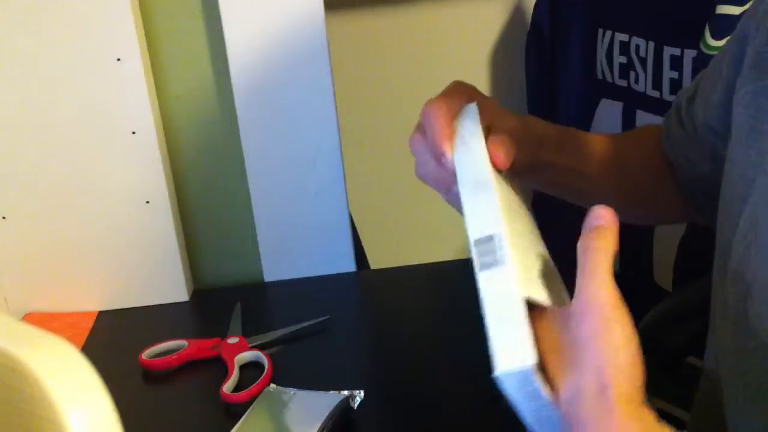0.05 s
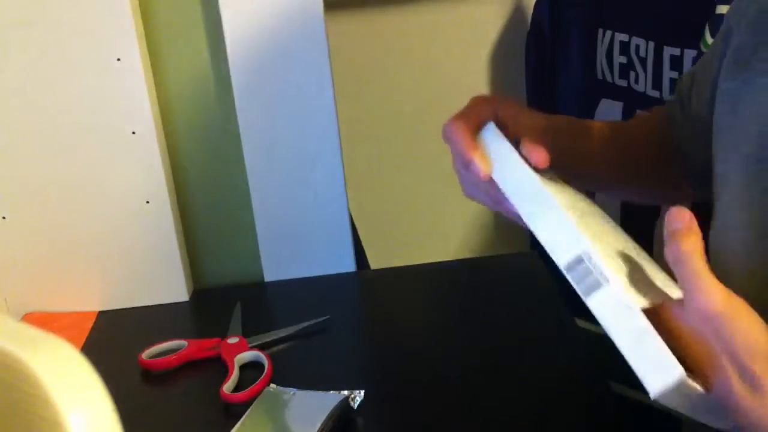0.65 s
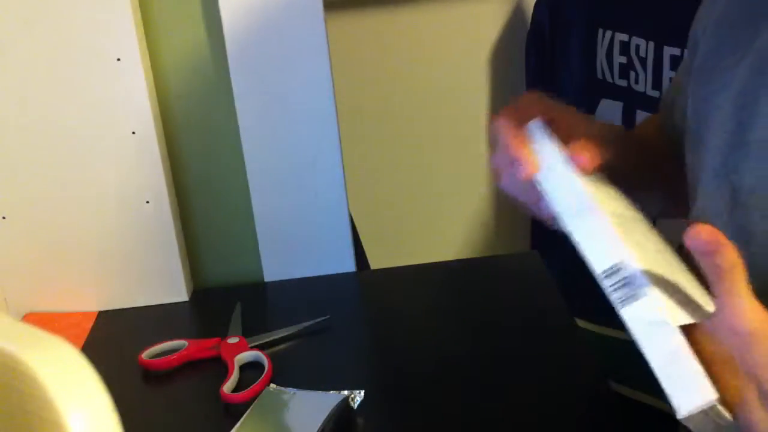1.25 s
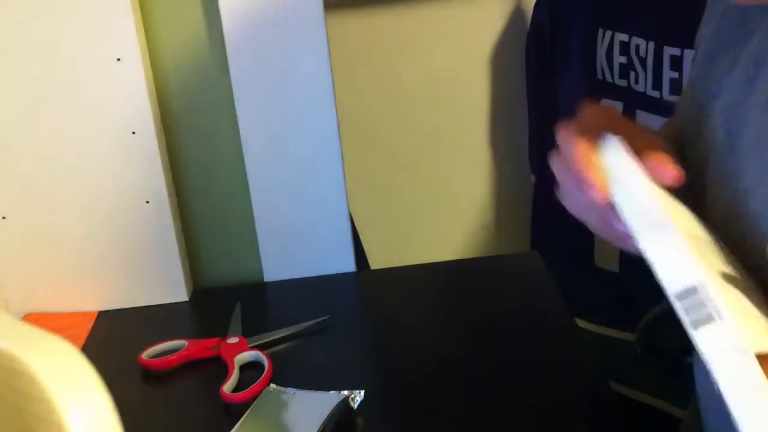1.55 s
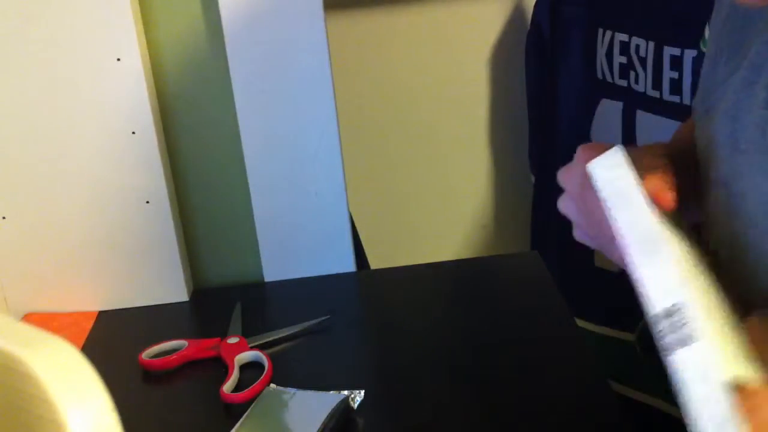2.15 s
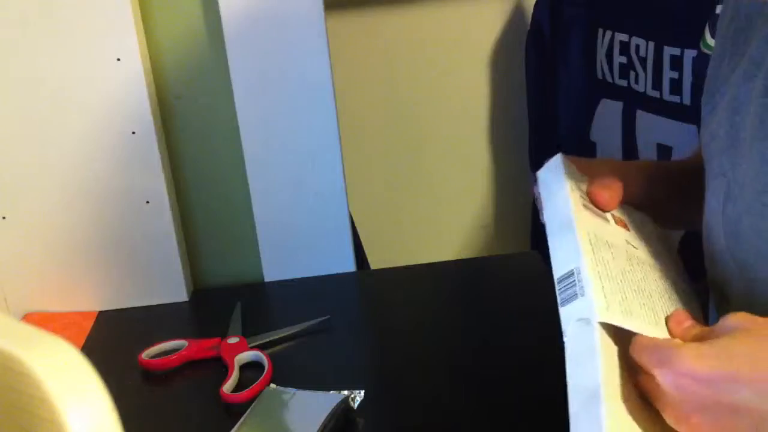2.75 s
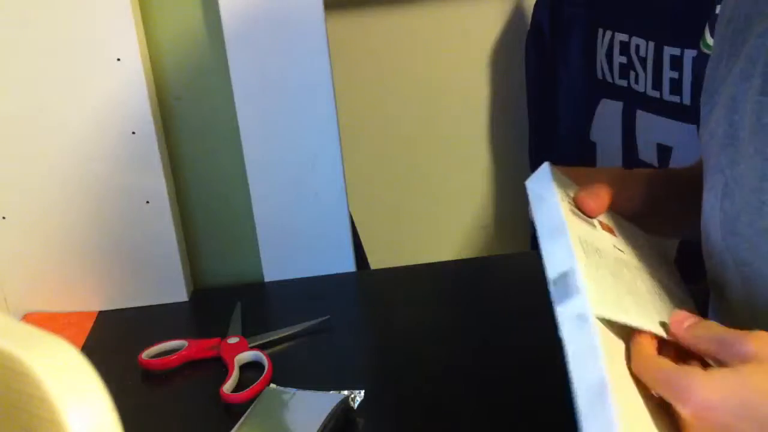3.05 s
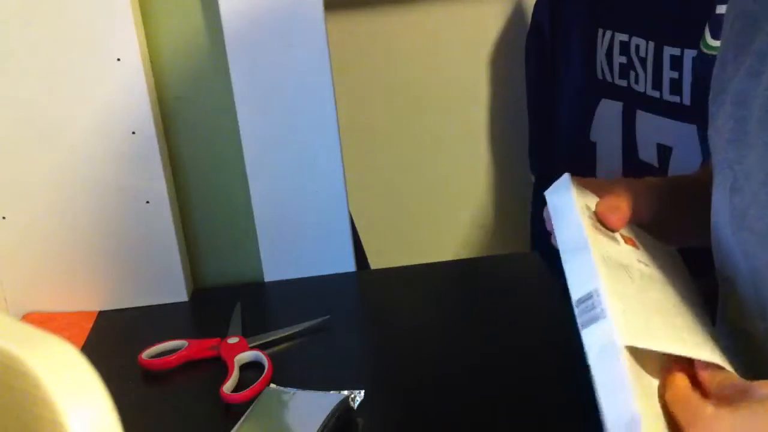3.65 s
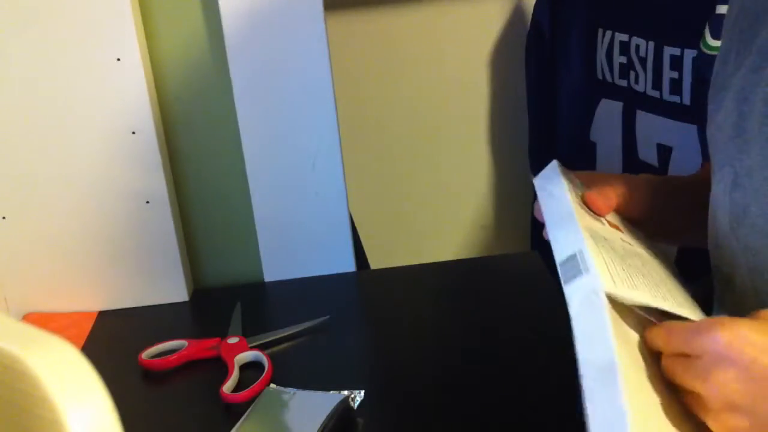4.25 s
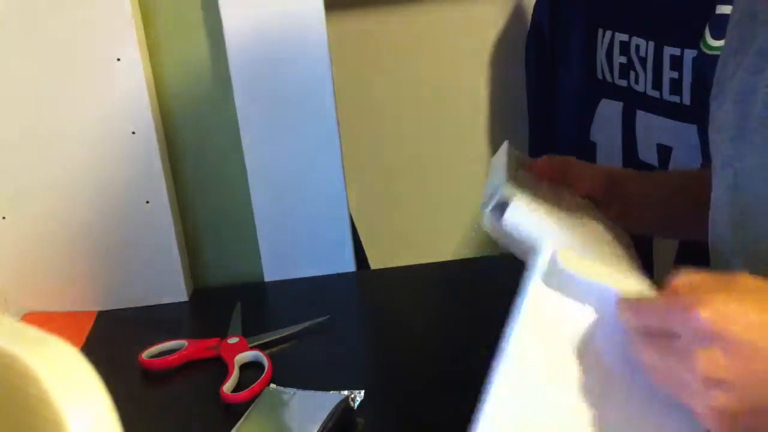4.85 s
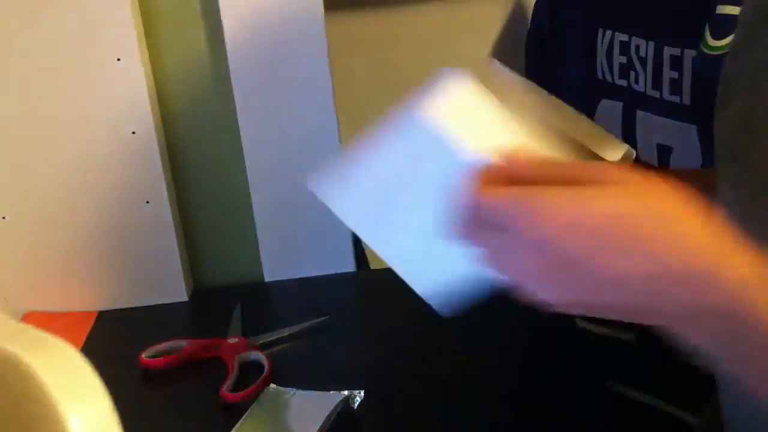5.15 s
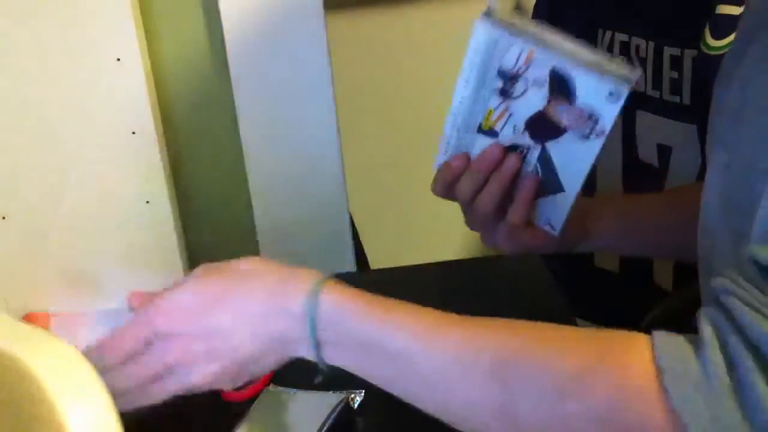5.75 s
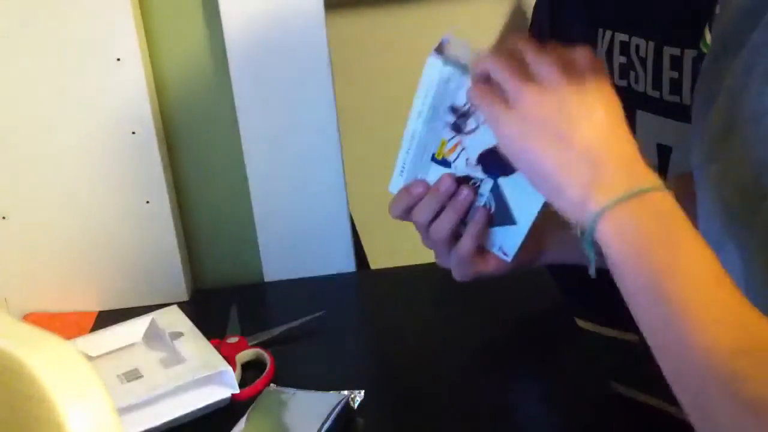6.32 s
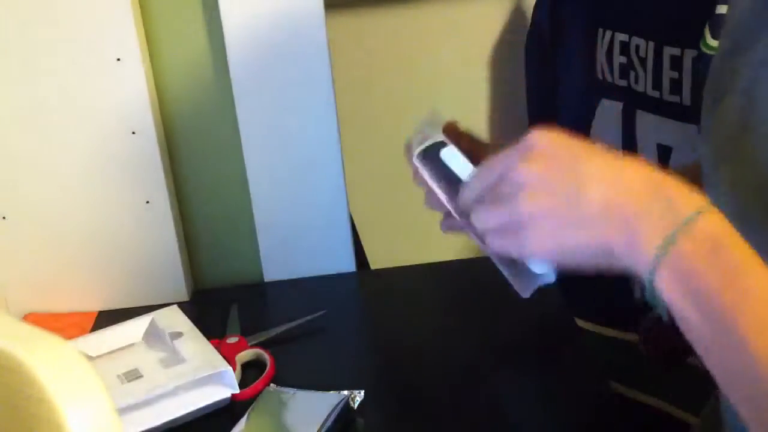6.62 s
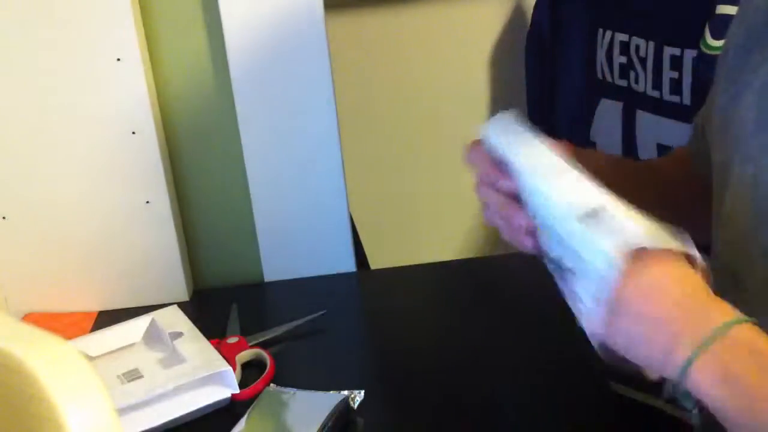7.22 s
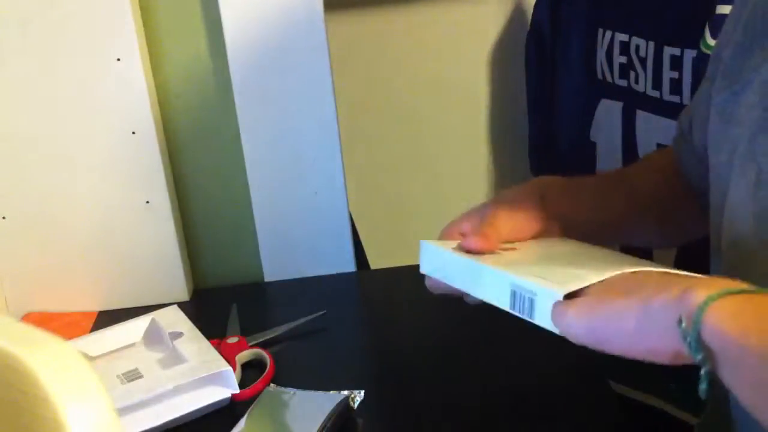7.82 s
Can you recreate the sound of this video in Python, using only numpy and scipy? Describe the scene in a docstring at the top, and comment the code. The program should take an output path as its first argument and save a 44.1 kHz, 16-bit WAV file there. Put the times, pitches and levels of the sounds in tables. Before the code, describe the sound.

Hands work at a small cardboard box in a quiet room. The card rubs and scrapes in short strokes, with little snaps and hollow taps, then creaks and rips free in one quick, loud tear. A light inner tray clatters onto a desk. A hand slides into the empty sleeve with a dry hiss and pops its wall out. It sounds close, over a faint hum.

```python
"""Opening a small cardboard box

Hands work a box open in a room: creases snap, card rubs and creaks as it sticks and slips, and a flap
rips free. The inner tray is dropped on a desk and clatters. A hand slides into the empty sleeve and
pops its wall out. Each knock rings the hollow card. A faint mains hum and hiss lie underneath."""
import sys
import numpy as np
from scipy import signal
from scipy.fft import rfft, irfft, next_fast_len
from scipy.io import wavfile
from scipy.ndimage import uniform_filter1d, map_coordinates

SR = 44100
rng = np.random.default_rng(int(sys.argv[2]) if len(sys.argv) > 2 else 0)


def waveform_to_disk(signal):
    """Save audio, clipped to [-1, 1], as 16-bit WAV at the path in sys.argv[1]."""
    frames = np.transpose(np.atleast_2d(signal))
    scaled = np.clip(frames, -1, 1) * 32767
    samples = np.round(scaled).astype(np.int16)
    wavfile.write(sys.argv[1], SR, samples)


N = 351803
HIT_SIZE = 8192  # samples in one hit or one filter

# The pitches at which the hollow box rings: pitch_hz, level_db
BOX_RINGS = [(490, 2), (555, 3.5), (630, 4), (760, 1), (940, -1.5), (1120, 0.5), (1280, -3.5), (1540, -0.5),
             (1780, -7), (2050, -46)]
# Tone of the low murmur of the held box: pitch_hz, level_db
MURMUR_TONE = [(60, -56), (110, -14), (160, 3), (300, 0), (420, 1.5), (800, -44.5)]
# Tone of card cracking: pitch_hz, level_db
CRACK_TONE = [(700, 2), (1300, -0.5), (1900, 2.5), (2500, 4), (3100, 1.5), (4200, -1.5), (5200, -6.5),
              (8000, -27.5)]
# Tone of the high fizz on top of a crack: pitch_hz, level_db
FIZZ_TONE = [(2500, -32), (4300, -11.5), (5200, 2), (6300, 4), (7400, -3.5), (10500, -5), (13000, -11.5),
             (16000, -28.5)]
# Fingers and card dragging on card, one row a stroke: start_s, end_s, body_db, scrape_boost_db
STROKES = [(0.0, 0.11, -51.5, 0.5), (0.195, 0.45, -57, -4), (0.573, 0.733, -53, -1),
           (0.773, 0.906, -58.5, -7), (0.97, 1.229, -56, -2.5), (1.419, 1.54, -53.5, -1.5),
           (1.535, 1.67, -49.5, -2.5), (1.683, 1.837, -57, 3), (1.878, 2.065, -51, -4.5),
           (2.072, 2.31, -52, -1), (2.364, 2.495, -50, 0), (2.571, 2.632, -57.5, -1.5),
           (2.759, 2.9, -51.5, -7), (3.0, 3.276, -56, 0), (3.367, 3.453, -62, -2), (3.487, 3.671, -55.5, 2),
           (3.701, 3.943, -55, 4), (3.976, 4.086, -65.5, -1.5), (4.099, 4.269, -54.5, -0.5),
           (4.339, 4.67, -58, 2), (4.85, 5.05, -63, 3), (5.783, 5.87, -83, 18), (6.555, 6.81, -62.5, 0)]


def amp(db):
    """Turn decibels into a gain to multiply by."""
    return 10 ** (np.asarray(db) / 20)


def unit(x):
    """Scale a sound to an average (rms) level of 1."""
    return x / np.sqrt(np.mean(x ** 2) + 1e-20)


def unit_hit(x, first_s=0.012):
    """Scale a hit so that its first moments have an average (rms) level of 1."""
    return x / np.sqrt(np.mean(x[:int(first_s * SR)] ** 2) + 1e-20)


def along(points, hz):
    """Read between (pitch_hz, value) points, giving each octave equal room."""
    pitches, values = np.transpose(points)
    return np.interp(np.log(hz + 1), np.log(pitches), values)


def wobble(per_s):
    """A smooth curve through per_s random values a second."""
    return map_coordinates(rng.standard_normal(int(N * per_s / SR) + 4), [np.arange(N) * per_s / SR])


def through(x, response):
    """Filter a sound. The response is what the filter gives back for a single click."""
    return signal.fftconvolve(x, response)[:len(x)]


def sharp_filter(gain):
    """A filter with the given gain at each pitch and no sound ahead of its attack."""
    cepstrum = irfft(np.log(gain + 1e-6))
    # Folding the second half onto the first moves the energy to the start.
    cepstrum[1:HIT_SIZE // 2] *= 2
    cepstrum[HIT_SIZE // 2 + 1:] = 0
    return irfft(np.exp(rfft(cepstrum)))


def tone(points):
    """A filter that follows (pitch_hz, level_db) points."""
    return sharp_filter(amp(along(points, np.fft.rfftfreq(HIT_SIZE, 1 / SR))))


def resonator(rings, scatter_db=0, detune=0, sharpness=11):
    """A filter that rings briefly like card; a new grip can shift each ring's level and pitch."""
    hz = np.fft.rfftfreq(HIT_SIZE, 1 / SR)
    spectrum = 0
    for k, (pitch_hz, level_db) in enumerate(rings):
        centre = pitch_hz * np.exp(detune * rng.normal())
        gain = (-1) ** k * amp(level_db + scatter_db * rng.normal())
        loss = 1j * hz * centre / sharpness
        spectrum = spectrum + gain * loss / (centre ** 2 - hz ** 2 + loss)
    return irfft(spectrum)


def fibres(size, per_s, spread_db):
    """Fibres slip and break at random moments: tiny clicks, a few larger than the rest."""
    happens = rng.random(size) < per_s / SR
    signs = rng.choice([-1, 1], size)
    strengths = amp(spread_db * np.minimum(rng.exponential(size=size), 4))
    return unit(happens * signs * strengths)


def crackle(fade_s, first_break):
    """One sharp break and a burst of small ones that dies by 60 dB in fade_s."""
    t = np.arange(HIT_SIZE) / SR
    burst = fibres(HIT_SIZE, per_s=5000, spread_db=3.5) * amp(-60 * t / max(fade_s, 0.003))
    burst /= np.linalg.norm(burst) + 1e-9
    burst[int(0.0006 * SR)] += first_break
    power = np.abs(uniform_filter1d(np.abs(rfft(burst)) ** 2, size=80))
    return through(burst, sharp_filter(1 / np.sqrt(power + 1e-6)))  # all pitches about equally strong


def background():
    """Steady hiss and the hum of a mains appliance."""
    # The tones of the hum: pitch_hz, level_db
    hum_tones = [(119.3, -68.5), (238, -78.5)]
    # Tone of the room's hiss: pitch_hz, level_db
    air_tone = [(25, 1), (70, -11), (120, -8), (200, -15), (330, -20), (650, -14), (1200, -17),
                (2500, -22.5), (6000, -26), (14000, -30.5), (16000, -32)]
    t = np.arange(N) / SR
    hum = sum(amp(db) * np.sqrt(2) * np.sin(2 * np.pi * hz * t + 0.14 * wobble(1.9))
              for hz, db in hum_tones)
    return hum + amp(-63) * unit(through(rng.standard_normal(N), tone(air_tone)))


def room_echo(x, early_db, tail_db):
    """Desk and near walls answer first, then the room rings; each short block gets a new random echo."""
    # How long the room takes to fade by 60 dB: pitch_hz, fade_s
    fade_times = [(150, 0.3), (500, 0.17), (1500, 0.26), (5000, 0.25), (14000, 0.22)]
    out, block = np.zeros(N + 2 * SR), SR // 3
    for start in range(0, N, block):
        hz, t, noise = signal.stft(rng.standard_normal(SR // 2), SR, nperseg=256)
        fade = amp(-60 * t / along(fade_times, hz)[:, None])
        build_up = 1 - np.exp(-t / 0.03)
        tail = signal.istft(noise * fade * build_up, SR, nperseg=256)[1]
        response = amp(tail_db) * tail / np.linalg.norm(tail)
        wall_delays = (rng.uniform(0.003, 0.014, size=6) * SR).astype(int)
        response[wall_delays] += amp(early_db) * rng.uniform(0.21, 1, size=6)
        echo = signal.fftconvolve(x[start:start + block], response)
        out[start:start + len(echo)] += echo
    return out[:N]


def stroke(start, end, rise_s=0.014, sag_db=4.5, fade_s=0.3):
    """Loudness of one drag: it grips quickly, eases as it goes and dies away when the fingers stop."""
    t = np.arange(N) / SR
    rise = np.clip((t - start) / rise_s + 0.5, 0, 1)
    progress = np.clip((t - start) / (end - start), 0, 1)
    release = np.clip((t - end) / fade_s, 0, 2)
    return rise * amp(-sag_db * progress - 60 * release)


def rubbing():
    """Card drags on card: coarse slips ring the box, finer ones scrape, and edges tick free."""
    # Tone of card scraping on card: pitch_hz, level_db
    scrape_tone = [(700, -4.5), (1400, -20.5), (2000, 5), (3100, 1), (4300, -0.5), (6200, 0), (7600, -5),
                   (11000, -5.5), (16000, -17.5)]
    press, drag = np.zeros(N), np.zeros(N)
    for start, end, body_db, scrape_boost_db in STROKES:
        gain = amp(body_db) * stroke(start, end)
        press += gain
        drag += amp(scrape_boost_db) * gain
    grip_db = 3.6 * wobble(40)  # the fingers catch and let go
    slips = fibres(N, per_s=1200, spread_db=5)
    ticks = fibres(N, per_s=56, spread_db=2.5)
    grain = fibres(N, per_s=7400, spread_db=2)
    murmur = amp(-8) * unit(through(rng.standard_normal(N), tone(MURMUR_TONE)))
    body = amp(-1) * unit(through(slips + 0.36 * ticks, resonator(BOX_RINGS, scatter_db=2)))
    scrape = amp(-2.5) * unit(through(0.74 * slips + 0.23 * ticks + grain, tone(scrape_tone)))
    return amp(grip_db) * (press * (murmur + body) + drag * scrape)


def sliding():
    """The hand pushes into the sleeve, speeding up and slowing down: a hiss over the box's murmur."""
    # The pushes of the hand: start_s, end_s, level_db
    pushes = [(6.787, 6.996, -52.5), (6.981, 7.176, -47), (7.18, 7.563, -47.5), (7.677, 7.873, -55.5),
              (7.868, 8.044, -62)]
    # Tone of skin sliding on card: pitch_hz, level_db
    skin_tone = [(700, -10), (1300, -9), (2500, 1), (4300, -4), (6000, 1.5), (8000, -3), (11500, -0.5),
                 (14000, -6.5), (16000, -14.5)]
    t, push = np.arange(N) / SR, np.zeros(N)
    for start, end, level_db in pushes:
        speed = np.abs(np.sin(np.pi * np.clip((t - start) / (end - start), 0, 1)))
        push += amp(level_db) * speed ** 0.78  # faster is louder
    slips = fibres(N, per_s=4400, spread_db=0.5)
    flicker = amp(1.7 * wobble(25) + 0.2)
    hiss = flicker * unit(through(fibres(N, per_s=11000, spread_db=4), tone(skin_tone)))
    body = unit(through(slips, resonator(BOX_RINGS, scatter_db=-4.5)))
    murmur = amp(-7.5) * unit(through(slips, tone(MURMUR_TONE)))
    return push * (hiss + amp(-9 + 2.3 * wobble(30)) * (body + murmur))


def squeaking(fade_s=0.037):
    """A tight spot chirps: a brief run of slips rings the card at one pitch."""
    # Card squeaking on card: start_s, pitch_hz, level_db
    squeaks = [(0.603, 2020, -51.5), (0.66, 1940, -47.5), (0.695, 2500, -54), (1.91, 2150, -46)]
    out, t = np.zeros(N + HIT_SIZE), np.arange(HIT_SIZE) / SR
    for start, pitch_hz, level_db in squeaks:
        slips = fibres(HIT_SIZE, per_s=1800, spread_db=0.5) * amp(-60 * t / fade_s)
        chirp = unit_hit(through(slips, resonator([(pitch_hz, 0)])))
        out[int(start * SR):][:HIT_SIZE] += amp(level_db) * chirp
    return out[:N]


def creaking():
    """A tight edge sticks and slips, in uneven runs of dry ticks or in single jerks."""
    # Edges creaking past each other: start_s, end_s, slips_per_s, level_db
    creaks = [(0.606, 0.686, 89, -56.5), (4.131, 4.24, 72, -58.5), (4.426, 4.53, 75, -57)]
    # Edges slipping just once: start_s, level_db
    jerks = [(2.827, -29), (2.981, -33.5), (4.1679, -29), (4.2203, -27), (4.341, -29), (4.367, -31.5),
             (4.3869, -32), (4.4189, -30.5), (4.5386, -30), (7.129, -26.5)]
    slips = np.zeros(N)
    for start, end, per_s, level_db in creaks:
        pace, strength = rng.standard_normal((40, 2)).T
        times = start + np.cumsum(np.exp(0.3 * pace) / per_s)
        sizes = amp(level_db + 3 * strength) * np.sqrt(SR / per_s)
        slips[(times[times < end] * SR).astype(int)] += sizes[times < end]
    for start, level_db in jerks:
        slips[int(start * SR)] += amp(level_db + 7)
    tick = through(crackle(fade_s=0.018, first_break=0.15), tone(CRACK_TONE) + amp(-1) * tone(FIZZ_TONE))
    return through(slips, tick / np.linalg.norm(tick))


def ripping():
    """A running tear or scrape: fibres break thick and fast for as long as the pull lasts."""
    # Runs of breaking or scraping fibres: start_s, end_s, level_db
    rips = [(0.577, 0.657, -66), (2.004, 2.015, -36), (2.02, 2.088, -46), (4.664, 4.693, -31),
            (5.902, 5.973, -42)]
    t = np.arange(N) / SR
    pull = sum(amp(db) * np.interp(t, [start - 0.004, start + 0.004, end, end + 0.006], [0, 1, 1, 0])
               for start, end, db in rips)
    breaks = fibres(N, per_s=2900, spread_db=1)
    body = amp(-3) * unit(through(breaks, resonator(BOX_RINGS)))
    murmur = amp(-13.5) * unit(through(breaks, tone(MURMUR_TONE)))
    crack = unit(through(breaks, tone(CRACK_TONE)))
    fizz = amp(-0.5) * unit(through(breaks, tone(FIZZ_TONE)))
    return pull * unit(body + murmur + crack + fizz)


def crease_filter():
    """Each creased spot adds one short, papery ring to its own crack."""
    response = amp(2.5) * resonator([(3050, 0)], scatter_db=1, detune=0.3)
    response[0] += 1  # lets the crack itself through
    return response


def hits(rows, rings, bends, first_break, thump_gain, body_gain, crack_gain, fizz_gain):
    """Each hit cracks and fizzes, rings the hollow body and bends the wide panels with a thump."""
    out, t = np.zeros(N + 2 * HIT_SIZE), np.arange(HIT_SIZE) / SR
    crack_filter, fizz_filter = tone(CRACK_TONE), tone(FIZZ_TONE)
    for start, thump_db, body_db, crack_db, fizz_boost_db, fade_s, pitch_hz in rows:
        burst = crackle(fade_s, first_break)
        tautness = np.exp(0.067 * rng.normal())  # set by the grip
        thump = np.zeros(HIT_SIZE)
        for k, (hz, db, ring_s) in enumerate(bends):
            fade = amp(db + rng.normal() - 60 * t / ring_s)
            thump += (-1) ** k * fade * np.sin(2 * np.pi * hz * tautness * t)
        # The struck spot favours rings near one pitch; the others lose 8.5 dB an octave.
        favoured = [(hz, db - 8.5 * abs(np.log2(hz / pitch_hz))) for hz, db in rings]
        body = through(burst, resonator(favoured, scatter_db=3.5, detune=0.03))
        crack = through(through(burst, crack_filter), crease_filter())
        hit = thump_gain * amp(thump_db) * unit_hit(thump)
        hit += body_gain * amp(body_db) * unit_hit(body)
        hit += crack_gain * amp(crack_db) * unit_hit(crack)
        hit += fizz_gain * amp(crack_db + fizz_boost_db) * unit_hit(through(burst, fizz_filter))
        out[int(start * SR):][:HIT_SIZE] += hit
    return out[:N]


def tray_clatter(fade_s=0.065, fizz_boost_db=-1.5):
    """The tray hits the desk: hard landings on an edge ring high, soft ones on a flat side ring low."""
    # The tray landing and rocking: start_s, body_db, hardness_db
    landings = [(5.8546, -30.5, -8), (5.8871, -33.5, -5), (5.9136, -31.5, 4.5), (5.9382, -36.5, 0),
                (5.9624, -32, -7), (6.0127, -39, -0.5), (6.0282, -38, -6), (6.0591, -37.5, 2),
                (6.0814, -36.5, -7), (6.122, -48.5, -18), (6.1592, -49, -22), (6.2565, -51.5, -13)]
    # The pitches at which the hollow tray rings: pitch_hz, level_db
    tray_rings = [(400, 4.5), (490, -0.5), (570, -0.5), (700, 2.5), (930, -4.5), (1260, -0.5), (1600, -2.5)]
    # The tray's wide panels bending to and fro: pitch_hz, level_db, ring_s
    tray_bends = [(143, -2, 0.1), (212.4, -2.5, 0.31), (287, 3, 0.12), (378, -6.5, 0.19)]
    rows = []
    for start, body_db, hardness_db in landings:
        pitch_hz = 860 * 2 ** (hardness_db / 16.5)
        rows.append((start, body_db - 5.5, body_db, body_db + hardness_db, fizz_boost_db, fade_s, pitch_hz))
    return hits(rows, tray_rings, tray_bends, first_break=0.18,
                thump_gain=amp(2.5), body_gain=amp(1), crack_gain=amp(-1.2), fizz_gain=amp(-4))


def crinkles(per_s=5, tries=4):
    """Rows for snaps(): small creases give way at random during a stroke, louder in a strong one."""
    rows = []
    for start, end, body_db, scrape_boost_db in STROKES:
        for when, chance, softness in rng.random((tries, 3)):
            level_db = body_db + 0.5 - 3 * softness
            if chance < per_s * (end - start) / tries:
                rows.append((start + when * (end - start), level_db + scrape_boost_db - 2, level_db, 0))
    return rows


def snaps(pitch_hz=816):
    """Rows for hits(): a crease gives way with a short, bright crack that hardly bends the panel."""
    # Creases snapping: start_s, crack_db, body_db, fizz_boost_db
    creases = [(0.3058, -59, -50.5, 0), (0.5417, -48.5, -45, -5), (0.5786, -52, -52, -6),
               (0.9687, -49, -49, -4), (1.5673, -47.5, -40, -2), (2.0063, -34.5, -30, -7),
               (2.0673, -42.5, -40.5, -7), (2.1603, -58, -52, -5), (2.2091, -62, -50, -2),
               (2.3731, -62, -46, 3), (2.6017, -43, -43.5, 1.5), (2.7746, -50, -43.5, 2),
               (2.7997, -50, -43.5, 2.5), (2.8716, -52, -49, 0.5), (3.0029, -56, -50, -2.5),
               (3.072, -49.5, -60, 12), (3.6967, -44.5, -49.5, -4.5), (3.9339, -52.5, -54, -1),
               (5.0244, -50.5, -75, -4.5), (5.6541, -62.5, -58.5, -5), (6.585, -60.5, -59.5, 0),
               (6.6698, -52.5, -54.5, -2), (6.7205, -53.5, -48.5, -7.5), (7.2443, -48, -50.5, -5.5),
               (7.3986, -46.5, -35.5, 0), (7.6658, -33.5, -25, -7.5)]
    rows = []
    for start, crack_db, body_db, fizz_boost_db in creases + crinkles():
        fade_s = 0.021 * 2 ** (-fizz_boost_db / 12)  # brighter snaps are over sooner
        rows.append((start, body_db - 29, body_db, crack_db, fizz_boost_db, fade_s, pitch_hz))
    return rows


def knocks(fade_s=0.035):
    """Rows for hits(): a panel buckles or is knocked, giving a thump and a hollow ring."""
    # Panels buckling or being knocked: start_s, body_db, thump_db, hardness_db, pitch_hz
    contacts = [(0.065, -52.5, -47, -3, 600), (0.1494, -59, -46.5, -6, 524), (0.3736, -61, -53.5, -12, 487),
                (0.6162, -48.5, -47, -7, 680), (1.4252, -49.5, -72, -10, 643), (1.4507, -43, -70, -9, 610),
                (1.949, -44.5, -67, -19, 497), (2.393, -44.5, -32.5, -3, 650),
                (2.4714, -36, -45, -17.5, 620), (2.7521, -43, -39, -7, 1320),
                (3.2415, -48.5, -46.5, 2.5, 580), (3.3607, -54.5, -47, 0.5, 704),
                (3.4192, -44, -39, -7, 990), (3.5037, -39.5, -38.5, 2, 736), (4.6959, -27, -22, 0, 1180),
                (4.7168, -25.5, -26.5, -9, 1220), (4.7763, -42.5, -60, -22, 597),
                (4.831, -27, -34, -11, 1050), (5.188, -57, -64, -16, 765), (6.3669, -62.5, -56.5, -1, 686),
                (6.8254, -53, -51, -4, 666), (7.3168, -46.5, -60, -2.5, 560),
                (7.3842, -43.5, -55, -15, 604), (7.4226, -40.5, -55, -7, 686),
                (7.4626, -53, -43.5, -13, 670), (7.5313, -48, -61, -13, 680),
                (7.9089, -51.5, -74, -11, 1410)]
    rows = []
    for start, body_db, thump_db, hardness_db, pitch_hz in contacts:
        fizz_boost_db = 0.91 * hardness_db - 5.5  # harder knocks are brighter
        rows.append((start, thump_db, body_db, body_db + hardness_db, fizz_boost_db, fade_s, pitch_hz))
    return rows


def box_hits():
    """Knocked panels and snapping creases all ring the same hollow box."""
    # The box's wide panels bending to and fro: pitch_hz, level_db, ring_s
    box_bends = [(48, -18, .04), (149.5, -8.5, 0.053), (197.6, -5, 0.064), (310, -2.5, 0.018)]
    return hits(knocks() + snaps(), BOX_RINGS, box_bends, first_break=0.32,
                thump_gain=amp(-1.7), body_gain=amp(0.5), crack_gain=amp(2), fizz_gain=amp(3))


def scene():
    """Box and tray in the room, as one channel."""
    friction = rubbing() + sliding() + creaking() + ripping() + squeaking()
    card = friction + tray_clatter() + box_hits()
    return (card + room_echo(card, early_db=-15.5, tail_db=-10.5) + background())[None]


def record(dry, bass_hz=112, top_hz=15900):
    """The small microphone loses most of the deep bass and keeps nothing above top_hz."""
    bass_cut = signal.butter(4, bass_hz, "high", fs=SR, output="sos")
    thin = signal.sosfilt(bass_cut, dry) + amp(-18) * dry
    size = next_fast_len(N + SR // 2)
    in_range = np.fft.rfftfreq(size, 1 / SR) < top_hz
    return irfft(rfft(thin, size) * in_range, size)[:, :N]


dry = scene()
out = record(dry)
waveform_to_disk(out)
```